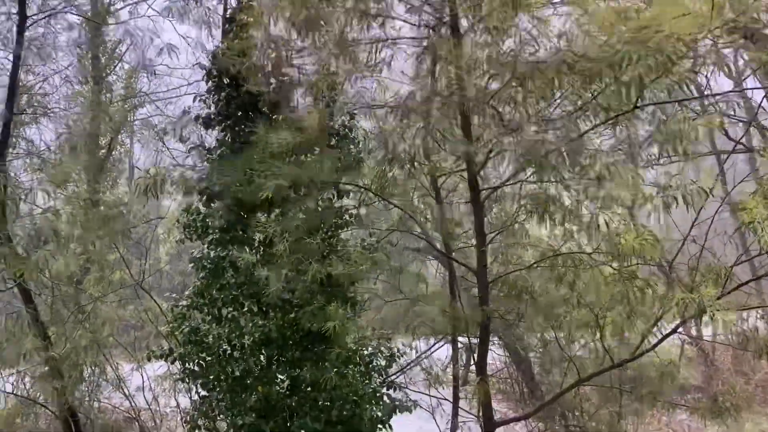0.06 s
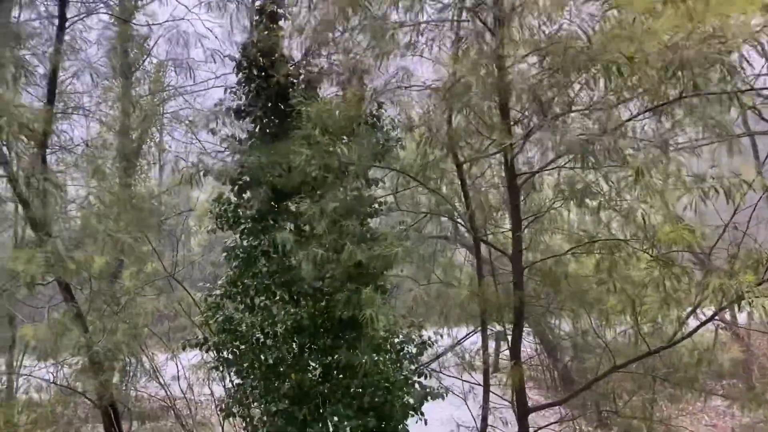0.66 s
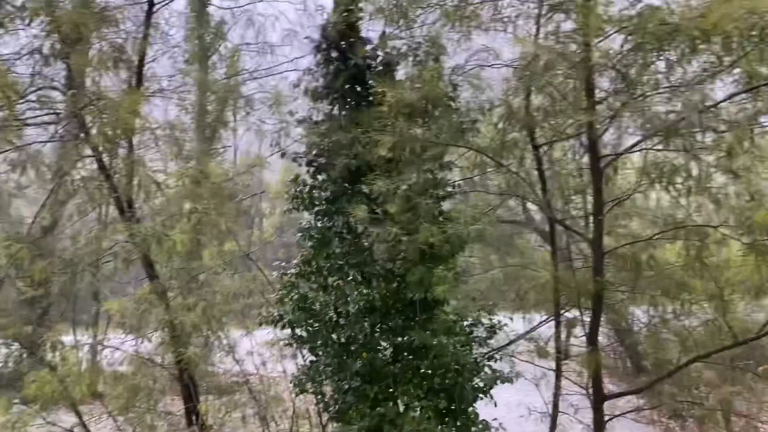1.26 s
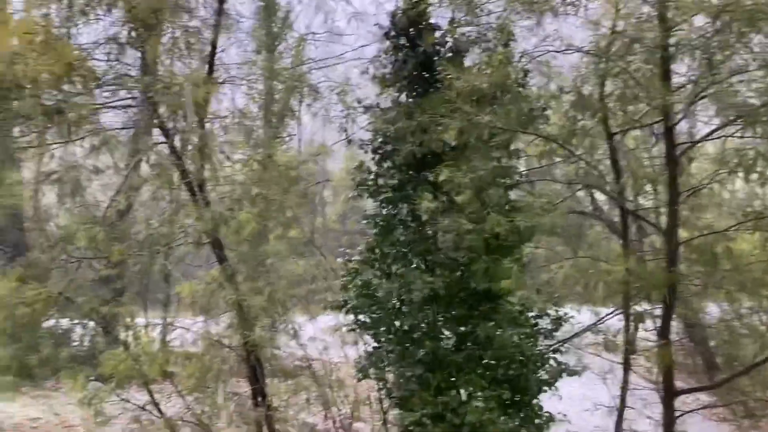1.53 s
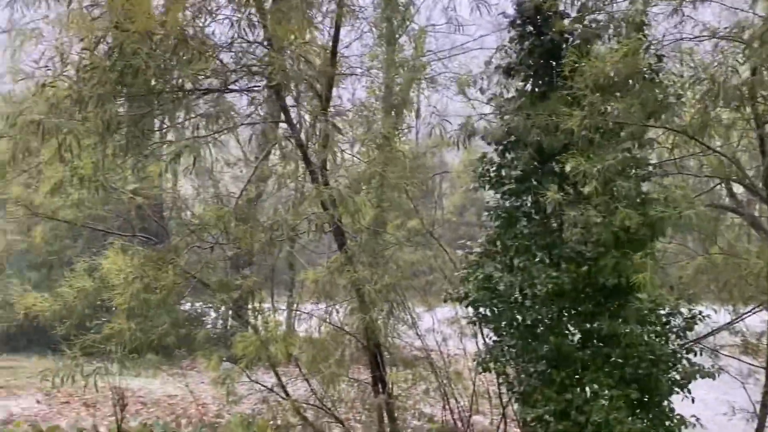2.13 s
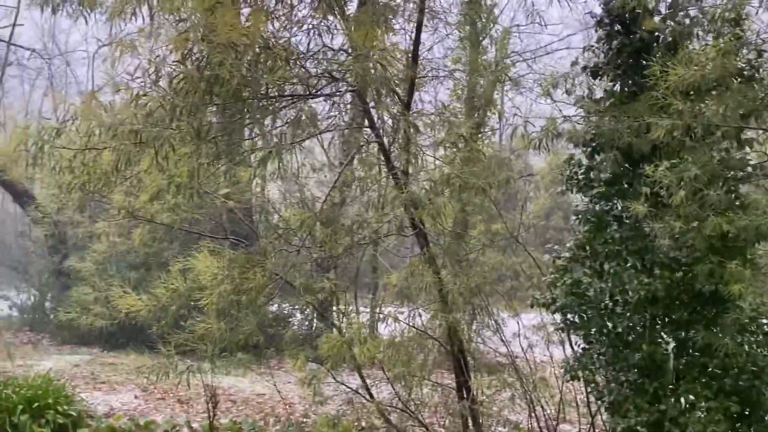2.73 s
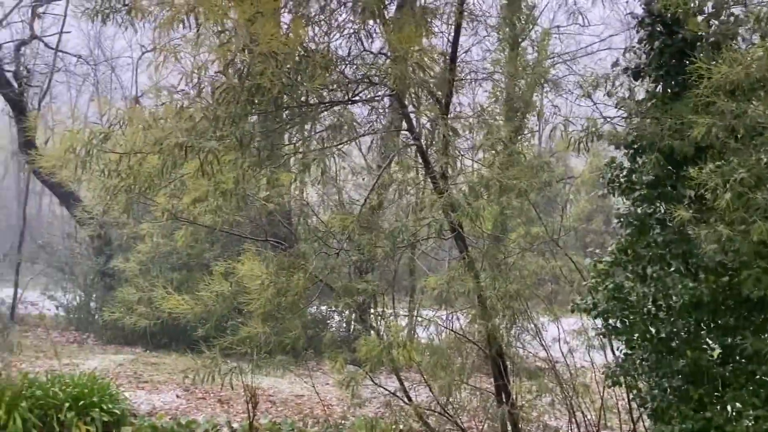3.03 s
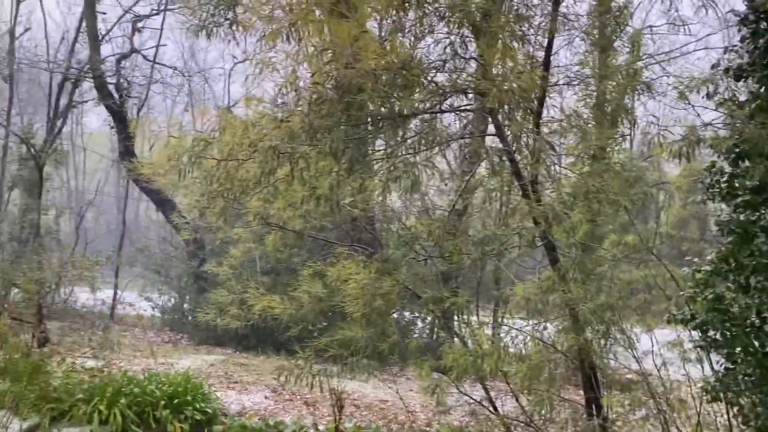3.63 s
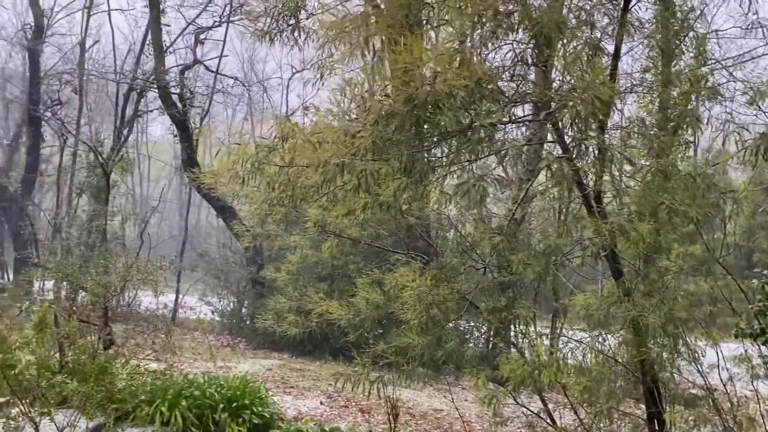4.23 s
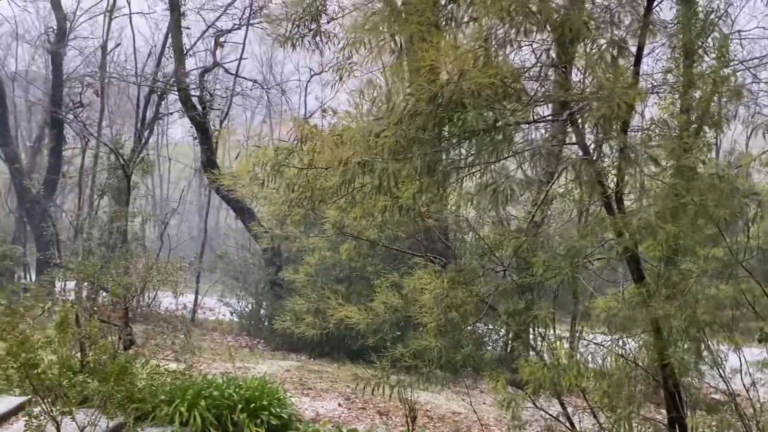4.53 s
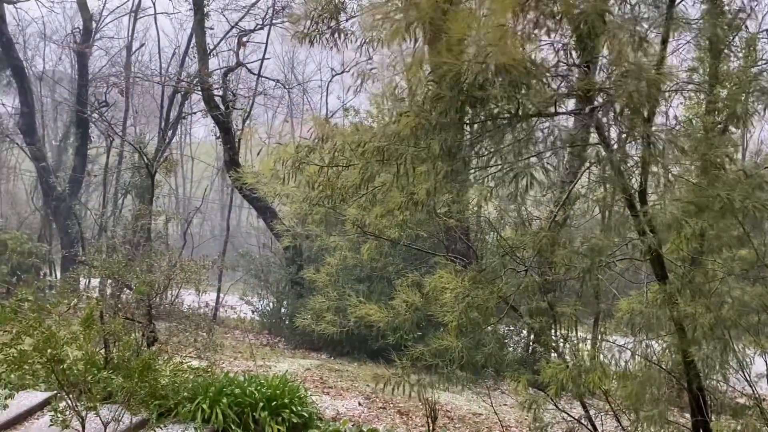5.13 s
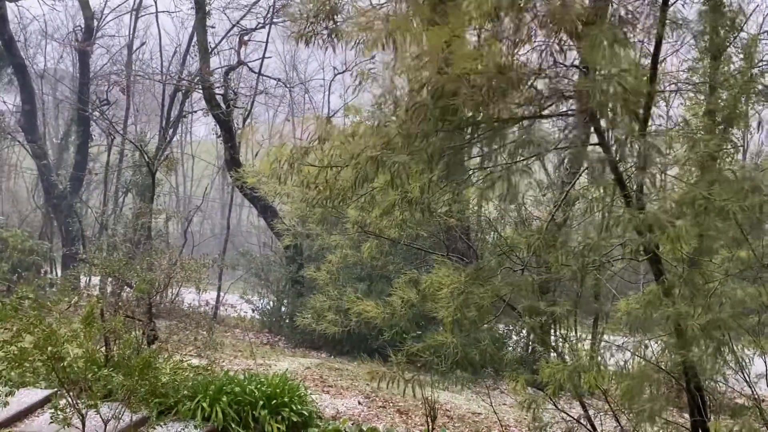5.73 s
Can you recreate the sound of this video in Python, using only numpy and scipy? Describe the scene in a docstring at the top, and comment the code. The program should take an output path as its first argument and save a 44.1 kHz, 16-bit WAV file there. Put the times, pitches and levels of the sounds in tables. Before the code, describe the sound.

Rain and hail hiss and tick on garden trees while a deep rumble swells to a loud thunderclap, then fades.

```python
"""Rain and small hail hiss in garden trees over a far storm's dull wash, heard by two close microphones.
From the start, shock waves from a long lightning channel pile up into a rumble; fat drips tap nearby.
Pellets patter in flurries, thuds and cracks stand out, and close hailstones tick and knock.
Just after 2 s the thunder breaks into one loud peal, then rolls away while the shower goes on."""
import sys
import numpy as np
from scipy import signal
from scipy.fft import rfft, irfft
from scipy.io import wavfile
from scipy.ndimage import uniform_filter1d, minimum_filter1d

SR = 44100
rng = np.random.default_rng(int(sys.argv[2]) if len(sys.argv) > 2 else 0)


def waveform_to_disk(signal):
    """Save audio, clipped to [-1, 1], as 16-bit WAV at the path in sys.argv[1]."""
    frames = np.transpose(np.atleast_2d(signal))
    scaled = np.clip(frames, -1, 1) * 32767
    samples = np.round(scaled).astype(np.int16)
    wavfile.write(sys.argv[1], SR, samples)


N = 254942
TIME_S = np.arange(N) / SR
FREQ_HZ = np.fft.rfftfreq(N, 1 / SR)

# Microphone pair, low sounds: (frequency [Hz], left-right [dB], likeness [0-1], left lead [rad])
MIC_LOW = [(22.0, -8.2, 0.65, -1.27), (40.0, -11.3, 0.86, -1.6), (58.0, -14.4, 0.42, -2.47),
           (80.0, -9.5, 0.92, -4.57), (105.0, -7.6, 0.96, -5.0), (200.0, -6.7, 0.91, -5.6),
           (255.0, -5.6, 0.52, -5.85), (330.0, -3.2, 0.44, -4.19), (450.0, -1.3, 0.86, -4.03),
           (560.0, -0.1, 0.91, -4.09), (670.0, -0.6, 0.63, -4.1), (950.0, -1.8, 0.53, -4.22),
           (1400.0, -3.4, 0.69, -3.27), (1900.0, -3.4, 0.2, -3.04)]
# Microphone pair, hiss: (frequency [Hz], left-right [dB], likeness [0-1])
MIC_HIGH = [(1700.0, -3.6, 0.48), (2200.0, -1.5, 0.31), (3050.0, -1.0, 0.26), (3550.0, -0.2, 0.17),
            (4400.0, 0.9, 0.27), (5150.0, 2.6, 0.21), (5700.0, 1.7, 0.21), (6500.0, 0.4, 0.49),
            (7200.0, -3.3, 0.42), (7750.0, -6.0, 0.53), (8030.0, -13.8, 0.46), (8500.0, -11.4, 0.27),
            (9300.0, -10.1, 0.06), (10600.0, -20.4, 0.04)]
# Steady peaks and notches: (frequency [Hz], width [Hz], gain [dB])
MIC_RIPPLES = [(92.8, 9.7, 4), (130, 6.7, 2), (226.3, 46, -3), (344, 127, 3), (390, 30, -1.5),
               (446.5, 16, 5.5), (517, 15, 1.5), (576, 25, 1.5), (669, 110, 5.5), (740, 70, -0.5),
               (870, 31, 2.5), (5550, 250, -6), (7880, 200, -0.5), (8070, 150, 4)]
# Rain and hail on leaves: (frequency [Hz], relative density [dB])
HISS_SPECTRUM = [(1700.0, 3), (2200.0, -5), (3050.0, 0.5), (3550.0, -2), (4400.0, -1), (5150.0, 0.5),
                 (5700.0, 2.1), (6500.0, 0.5), (7200.0, -1.5), (7750.0, -4.5), (8030.0, -4), (8500.0, -9),
                 (9300.0, -23), (10600.0, -30)]
# Shower strength: (time [s], level [dB])
HISS_LEVEL = [(0.0, -51), (0.27, -52), (1.64, -51.5), (2.95, -53), (3.28, -53), (4.4, -53.5), (4.75, -52),
              (5.78, -52.5)]
# Distant storm: (frequency [Hz], relative density [dB])
WASH_SPECTRUM = [(20, -24), (70, -3), (130, -8.5), (200, -5), (330, -14.5), (420, -18.5), (560, -28),
                 (1000, -21), (1450, -24), (2600, -40)]
# Thunder before band levelling: (frequency [Hz], relative density [dB])
THUNDER_SPECTRUM = [(22.0, -14.5), (40.0, -1.5), (58.0, 7), (80.0, 8), (105.0, 3.5), (135.0, 0.5),
                    (200.0, -2.5), (255.0, -8.5), (330.0, -15), (450.0, -18), (560.0, -24), (670.0, -30),
                    (950.0, -28), (1400.0, -38), (1900.0, -51)]
# Thunder tone before band levelling: (time [s], deep bass [dB], low midrange [dB])
THUNDER_TONE = [(0.3, 8, 0.5), (0.6, -13, 3), (1.0, -11, -2), (1.85, 2, -4), (2.2, 0, -1.5), (2.6, 7.5, 2),
                (3.0, 10.5, -1.5), (3.6, 0, -5.5), (4.6, -4.5, -5), (5.78, 7, -4)]
# Long rumble under the volleys: (time [s], level [dB])
RUMBLE_LEVEL = [(0, -36), (.55, -37.5), (.64, -41.5), (.95, -40.5), (1.17, -40), (1.6, -34), (2.0, -31.5),
                (2.4, -22.5), (2.95, -29), (3.3, -35), (3.55, -34), (4.1, -36.5), (4.68, -41), (4.85, -42),
                (5.0, -39), (5.4, -42), (5.78, -38)]
# One volley per stretch of lightning channel:
# (time [s], length [s], body [dB], boom [dB re body], tear [dB re body], crackle [dB re body])
SHOCK_VOLLEYS = [(0.229, 0.088, -36, 0, -18, -16), (1.233, 0.038, -33, -13, -23, -23),
                 (1.344, 0.036, -34.5, -11, -20, -16), (1.59, 0.1, -32.5, 0.5, -17, -19.5),
                 (1.664, 0.24, -25, -8, -21.5, -25.5), (1.938, 0.034, -23.5, -2, -16.5, -32),
                 (2.025, 0.036, -30, 12, -5, -21), (2.074, 0.088, -19.5, -2.5, -10, -20),
                 (2.169, 0.11, -21.5, 5, -9.5, -16), (2.251, 0.14, -23, 3, -4, -14),
                 (2.414, 0.082, -21, -4, -13, -24.5), (2.48, 0.05, -24, 0, -19, -18.5),
                 (2.554, 0.075, -24, 3.5, -16.5, -20.5), (2.648, 0.11, -26.5, -15, -16, -22),
                 (2.768, 0.16, -33, 6.5, -12.5, -22), (2.99, 0.096, -31.5, 4, -25, -23),
                 (3.092, 0.12, -28.5, 3.5, -17.5, -29), (3.193, 0.1, -38, 15.5, -8, -29),
                 (3.327, 0.039, -28.5, -10, -14.5, -24), (3.39, 0.11, -28.5, -17, -26, -31),
                 (3.591, 0.079, -33, 7, -17, -36), (3.76, 0.14, -38, 0.5, -28, -32),
                 (3.9, 0.15, -42, 13, -14, -35), (4.11, 0.07, -44.5, 13, -10, -26),
                 (4.3, 0.19, -40.5, -11, -19, -30), (4.473, 0.065, -46, 11, -14, -26),
                 (4.58, 0.043, -39, 4, -25, -24), (4.73, 0.19, -34.5, -10, -25, -37),
                 (5.464, 0.038, -41, -4, -14, -28), (5.62, 0.19, -44, 3.5, -24, -21)]
# Damped modes of a knock: (pitch ratio [1], level [dB], t60 [s])
TAP_MODES = [(0.8, -11, 0.02), (1, 0, 0.022), (1.24, -12, 0.018), (1.6, -22, 0.015)]
# Bunched pellets: (time [s], length [s], maximum knock peak [dB], centre pitch [Hz])
PELLET_FLURRIES = [(0.289, 0.05, -40, 973), (0.926, 0.045, -43, 656), (0.997, 0.04, -42.5, 784),
                   (1.192, 0.055, -41, 753), (1.394, 0.035, -47, 850)]
# Strong single shocks: (centre time [s], level [dB], pitch [Hz], length [s])
SHOCK_THUDS = [(0.335, -18, 103, 0.012), (1.025, -24.5, 125, 0.01), (1.033, -25.5, 201, 0.016),
               (1.243, -25, 140, 0.017), (1.279, -23.5, 115, 0.013), (1.422, -22, 140, .018),
               (1.61, -17, 100, 0.0077), (1.638, -20, 283, 0.015), (1.707, -17.5, 105, 0.014),
               (1.833, -15, 190, .02), (1.955, -18, 110, 0.019), (1.984, -11.5, 180, 0.016),
               (2.087, -7.5, 135, 0.017), (2.118, -6, 120, .028), (2.183, -4.5, 106, .034),
               (2.212, -12.5, 251, 0.012), (2.232, -8.5, 98, .026), (2.278, -4, 118.6, 0.018),
               (2.318, -1, 66.5, 0.015), (2.344, -9.5, 125, .016), (2.366, -3.5, 66, 0.016),
               (2.415, -10, 100, .02), (2.493, -8.5, 103, .026), (2.538, -11.5, 80, 0.012),
               (2.569, -10, 120, 0.015), (2.621, -9.5, 82, 0.015), (2.675, -11, 98, 0.016),
               (2.729, -17, 193, 0.028), (2.773, -12.5, 88, 0.011), (2.853, -18, 84, 0.025),
               (2.896, -13.5, 88, 0.024), (2.953, -13.5, 88, 0.025), (3.018, -21.5, 216, .018),
               (3.116, -13, 92, 0.011), (3.132, -21.5, 199, .02), (3.17, -16.5, 80, .02),
               (3.194, -23, 192, 0.03), (3.241, -13.5, 73, 0.017), (3.304, -12, 72, 0.021),
               (3.411, -14.5, 92, 0.0099), (3.44, -18.5, 190, 0.017), (3.554, -15.5, 98, .014),
               (3.619, -26, 90, 0.028), (3.803, -15.5, 122, 0.012), (4.38, -22, 110, .014),
               (4.472, -23, 88, .018), (4.865, -24, 138, .016), (5.333, -28.5, 72, 0.024),
               (5.609, -27.5, 185, 0.023), (5.735, -21.5, 78, 0.014)]
# Sharp cracks in the thunder: (time [s], level [dB], pitch [Hz])
SHOCK_CRACKS = [(0.773, -47.5, 465), (1.617, -39.5, 700), (1.70, -40, 940), (1.82, -35, 426),
                (1.875, -34, 664), (2.094, -25.5, 417), (2.194, -34, 964), (2.205, -19, 345),
                (2.295, -25.5, 572), (2.33, -25.5, 644), (2.368, -30.5, 750), (2.55, -28.5, 626),
                (2.589, -30.5, 715), (2.656, -33, 495), (2.722, -28.5, 463), (2.799, -32, 470),
                (2.848, -37, 480), (3.062, -36, 445), (3.518, -35, 453), (5.753, -47, 486)]
# Close hailstones: (time [s], level [dB], pitch [Hz], bandwidth [Hz], t60 [s])
HAILSTONES = [(1.364, -33, 6800, 1300, 0.083), (1.402, -36, 6500, 3000, 0.054),
              (1.410, -33.5, 4200, 4500, 0.06), (1.419, -34, 6000, 3500, 0.035),
              (1.866, -37, 7000, 3000, 0.046), (3.287, -35.5, 6400, 2400, 0.06),
              (3.37, -37, 6550, 1200, 0.039), (5.378, -41, 2300, 2000, 0.065),
              (5.410, -34.5, 6800, 1700, 0.071), (5.481, -41, 6600, 1500, .05)]
# Hail and fat drips on wood and earth: (time [s], peak [dB], pitch [Hz])
NEAR_KNOCKS = [(1.463, -36, 686), (4.136, -30.5, 700), (4.495, -45, 980), (4.602, -38, 720),
               (4.832, -41, 1080), (5.04, -47, 1670), (5.493, -38.5, 710)]


def gain_of(db):
    """Decibels to amplitude."""
    return 10 ** (np.asarray(db) / 20)


def over_frequency(table):
    """Table columns at every frequency."""
    hz, *columns = np.transpose(table)
    return [np.interp(np.log(FREQ_HZ + 1), np.log(hz + 1), column) for column in columns]


def over_time(table):
    """Table columns at every sample."""
    time_s, *columns = np.transpose(table)
    return [np.interp(TIME_S, time_s, column) for column in columns]


def unit_rms(x):
    """Scale to rms 1."""
    return x / np.sqrt(np.mean(x ** 2) + 1e-20)


def smoothed(x, window_s):
    """Hann-weighted moving average."""
    bell = np.hanning(int(window_s * SR))
    return signal.fftconvolve(x, bell, "same") / signal.fftconvolve(np.ones(N), bell, "same")


def lowpass(edge_hz, order):
    """Low-pass gain at every frequency."""
    return 1 / (1 + (FREQ_HZ / edge_hz) ** order)


def filtered(x, gain):
    """Apply a gain per frequency."""
    return irfft(rfft(x) * gain, x.shape[-1])


def add(mix, start_s, sound):
    """Mix in a multichannel sound."""
    part = mix[:, max(round(start_s * SR), 0):][:, :sound.shape[1]]
    part += sound[:, :part.shape[1]]


def impacts(per_s, spread_db, ring_s):
    """Two independent trains of random hits, mostly small, each smeared into a short noise tail."""
    size = gain_of(spread_db * np.minimum(rng.exponential(1, (2, N)), 4))
    hits = size * (rng.random((2, N)) < per_s / SR)
    power = signal.lfilter([1], [1, -np.exp(-1 / (ring_s * SR))], hits ** 2)
    return unit_rms(np.sqrt(power) * rng.standard_normal((2, N)))


def microphones(pair, colour_db, balance_db, likeness, lead_rad):
    """Colour two independent signals and blend them into partly alike left and right channels."""
    shared, own = rfft(pair)
    ripple_db = sum(db * np.exp(-(2 * (FREQ_HZ - hz) / width_hz) ** 2) for hz, width_hz, db in MIC_RIPPLES)
    gain_db = colour_db + ripple_db
    left = (likeness * shared + np.sqrt(1 - likeness ** 2) * own) * np.exp(1j * lead_rad)
    left *= gain_of(gain_db + balance_db / 2)
    right = shared * gain_of(gain_db - balance_db / 2)
    return irfft(np.array([left, right]), N)


def leaf_flutter(x, depth_db):
    """Clumps of drops hit different leaves: narrow bands swell and fade."""
    spectra = signal.stft(x, nperseg=512, noverlap=384)[2]
    patches = uniform_filter1d(rng.standard_normal(spectra.shape[1:]), size=7, axis=0)
    patches = unit_rms(uniform_filter1d(patches, size=12, axis=1))
    return signal.istft(spectra * gain_of(depth_db * patches), nperseg=512, noverlap=384)[1][:, :N]


def shower(low_hz=1750, left_lead_s=19 / SR):
    """Near pellets and drops crackle on leaves over the smooth hiss of far ones."""
    grains = 0.51 * impacts(per_s=2000, spread_db=3.0, ring_s=0.0005) + rng.standard_normal((2, N))
    grains = leaf_flutter(grains, depth_db=1.5)
    lead_rad = 2 * np.pi * FREQ_HZ * left_lead_s
    hiss = microphones(grains, *over_frequency(HISS_SPECTRUM), *over_frequency(MIC_HIGH), lead_rad)
    hiss = filtered(hiss, 1 - lowpass(low_hz, order=8))
    return gain_of(over_time(HISS_LEVEL)[0]) * hiss / hiss.mean(0).std()


def wash(level_db=-42):
    """Far rumble and rain drumming on the ground merge into a dull bed."""
    patter = impacts(per_s=430, spread_db=4.5, ring_s=0.0074) + 0.46 * rng.standard_normal((2, N))
    bed = microphones(patter, *over_frequency(WASH_SPECTRUM), *over_frequency(MIC_LOW))
    bed = filtered(bed, lowpass(2100, order=6))
    return gain_of(level_db) * bed / bed.mean(0).std()


def rumble_levels(tear_db=-14.5, crackle_db=-17, sway_db=1.66, sway_s=0.31, dulling_db_per_s=1.26):
    """Boom, body, tear, crackle amplitudes: turbulence sways the lows, growing distance dulls the highs."""
    level_db = over_time(RUMBLE_LEVEL)[0]
    low_db = level_db + sway_db * unit_rms(smoothed(rng.standard_normal(N), sway_s))
    high_db = level_db - dulling_db_per_s * TIME_S
    return gain_of([low_db, low_db, high_db + tear_db, high_db + crackle_db])


def volley_levels(length_s, body_db, boom_db, tear_db, crackle_db):
    """Boom, body, tear, crackle amplitudes of one volley: swell, hold, echo away over the land."""
    t = TIME_S[:SR]
    band_db = body_db + np.vstack([boom_db, 0, tear_db, crackle_db])
    rise_s = np.vstack([0.017, 0.017, 0.038, 0.038])
    t60_s = np.vstack([0.27, 0.35, 0.38, 0.38])
    echo_db = -60 * np.maximum(t - length_s, 0) / t60_s
    return np.clip(t / rise_s, 0, 1) * gain_of(band_db + echo_db)


def thunder(air_hz=2300, levelling_s=0.13):
    """Volleys of shock waves: near parts of the channel tear and crackle, far ones only boom."""
    direct = impacts(per_s=460, spread_db=2.0, ring_s=0.0037)
    scattered = 0.68 * rng.standard_normal((2, N))
    roar = microphones(direct + scattered, *over_frequency(THUNDER_SPECTRUM), *over_frequency(MIC_LOW))
    roar = filtered(roar, lowpass(air_hz, order=8))  # air absorbs treble
    deep = lowpass(83.5, order=8) - lowpass(38, order=8)
    midrange = lowpass(440, order=10) - lowpass(260, order=14)
    for band, db in zip([deep, midrange], over_time(THUNDER_TONE)):
        roar = roar + (gain_of(db) - 1) * filtered(roar, band)
    power = rumble_levels() ** 2
    for start_s, *volley in SHOCK_VOLLEYS:
        add(power, start_s, volley_levels(*volley) ** 2)
    boom, to_body, to_tear = lowpass(130, order=6), lowpass(400, order=8), lowpass(770, order=10)
    bands = [boom, to_body - boom, to_tear - to_body, 1 - to_tear]
    out = np.zeros((2, N))
    for band, level in zip(bands, np.sqrt(power)):
        part = filtered(roar, band)
        running_rms = np.sqrt(smoothed(part.mean(0) ** 2, levelling_s) + 1e-20)
        out += level * part / running_rms
    return out


def knock(peak_db, hz, left_lead_rad=0.61, rise_s=0.0065, spray_t60_s=0.028, detune=0.023):
    """A pellet or fat drip taps: heavily damped modes in a puff of spray."""
    t, phase_rad = TIME_S[:SR // 16], np.vstack([left_lead_rad, 0])
    ring = np.zeros((2, len(t)))
    for ratio, db, t60_s in TAP_MODES:
        mode_hz = hz * ratio * (1 + detune * rng.standard_normal())
        ring += gain_of(db - 60 * t / t60_s) * np.sin(2 * np.pi * mode_hz * t + phase_rad)
    spray_band = signal.butter(2, [hz / 2, hz * np.sqrt(2)], "band", fs=SR)
    spray = unit_rms(signal.lfilter(*spray_band, rng.standard_normal(ring.shape)))
    attack = 1 - np.exp(-(t / rise_s) ** 2)
    tap = attack * (ring + 0.09 * spray * gain_of(-60 * t / spray_t60_s))
    return gain_of(peak_db) * tap / abs(tap).max()


def drips(count=70, base_db=-55, range_db=9, low_hz=620, high_hz=1900):
    """Small drips land at random; higher ones are fainter."""
    out = np.zeros((2, N))
    for when, size, pitch in rng.random((count, 3)):
        hz = low_hz * (high_hz / low_hz) ** pitch
        add(out, when * N / SR, knock(base_db + range_db * size, hz) * np.sqrt(low_hz / hz))
    return out


def flurries(count=9, spread_octaves=0.44, range_db=5):
    """Pellets land almost together; their taps blur into a patter."""
    out = np.zeros((2, N))
    for start_s, length_s, peak_db, centre_hz in PELLET_FLURRIES:
        for k, (jitter, softness, pitch) in enumerate(rng.random((count, 3))):
            hz = centre_hz * 2 ** (spread_octaves * (pitch - .5))
            add(out, start_s + length_s * (k + jitter) / count, knock(peak_db - range_db * softness, hz))
    return out


def thuds():
    """Strong shocks stand out of the rumble, each rounded by distance into a few swings."""
    out, t = np.zeros((2, N)), TIME_S[:SR // 8]
    offset_s = t - t.mean()
    for centre_s, db, hz, length_s in SHOCK_THUDS:
        envelope = gain_of(db) * np.exp(-(2 * offset_s / length_s) ** 2)
        thump = envelope * np.cos(2 * np.pi * hz * offset_s)
        add(out[:1], centre_s - t.mean(), thump[None])  # row 0 feeds both microphones
    return microphones(out, 0, *over_frequency(MIC_LOW))


def cracks(rise_s=0.0061, t60_s=0.15, relative_width=0.7):
    """Kinks in the channel send tight clusters of shocks that snap out of the roar."""
    t, bins_hz = TIME_S[:SR // 4], np.fft.rfftfreq(SR // 4, 1 / SR)
    envelope = (1 - np.exp(-t / rise_s)) * gain_of(-60 * t / t60_s)
    out = np.zeros((2, N))
    for start_s, db, hz in SHOCK_CRACKS:
        band = 1 / (1 + (2 * (bins_hz / hz - 1) / relative_width) ** 4)
        burst = unit_rms(filtered(rng.standard_normal((2, len(t))), band))
        add(out, start_s, gain_of(db) * burst * envelope / envelope.max())
    return microphones(out, 0, *over_frequency(MIC_LOW))


def hailstone(level_db, hz, width_hz, t60_s, top_hz=8400, rise_s=0.0011):
    """A hailstone strikes close by: a bright burst that dies fast."""
    t, bins_hz = TIME_S[:SR // 8], np.fft.rfftfreq(SR // 8, 1 / SR)
    band = 1 / (1 + (2 * (bins_hz - hz) / width_hz) ** 2) / (1 + (bins_hz / top_hz) ** 20)
    burst = unit_rms(filtered(rng.standard_normal((2, len(t))), band))
    return .5 * burst * (1 - np.exp(-t / rise_s)) * gain_of(level_db - 60 * t / t60_s)


def scene():
    """Thunder over the shower, with close hailstones and knocks."""
    mix = thunder() + thuds() + cracks() + wash() + shower() + drips() + flurries()
    for start_s, *strike in HAILSTONES:
        add(mix, start_s, hailstone(*strike))
    for start_s, peak_db, hz in NEAR_KNOCKS:
        add(mix, start_s, knock(peak_db, hz))
    return mix


def record(dry):
    """Per-channel limiter on the low range holds down the peal; a low-pass follows."""
    ceiling, window_s, edge_hz = 0.92, 0.01, 11000
    low = filtered(dry, lowpass(2000, order=8))
    needed_gain = np.minimum(1, ceiling / (abs(low) + 1e-9))
    held_gain = minimum_filter1d(needed_gain, size=round(window_s * SR))
    gain = np.array([smoothed(channel, window_s) for channel in held_gain])
    limited = dry - low + low * gain
    taps = signal.firwin(511, edge_hz, window=("kaiser", 9), fs=SR)
    return signal.oaconvolve(limited, taps[None], "same")


dry = scene()
out = record(dry)
waveform_to_disk(out)
```